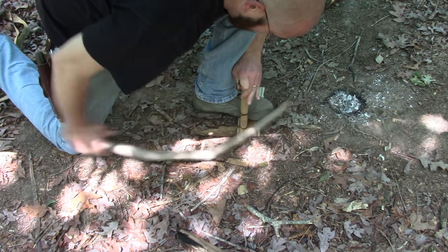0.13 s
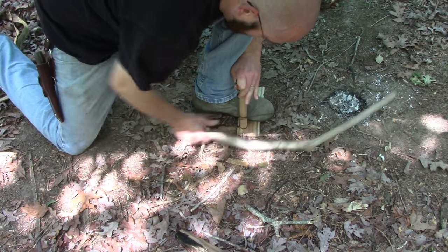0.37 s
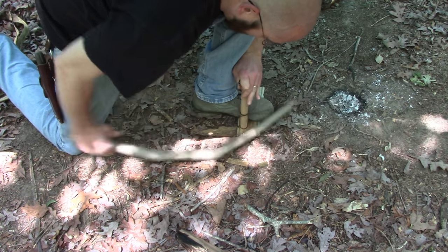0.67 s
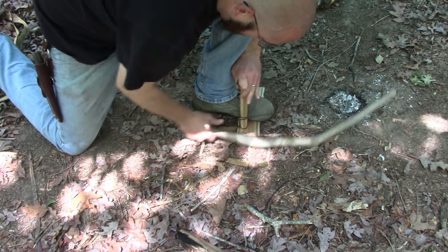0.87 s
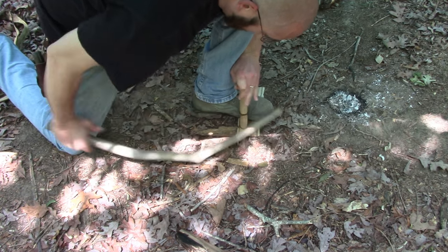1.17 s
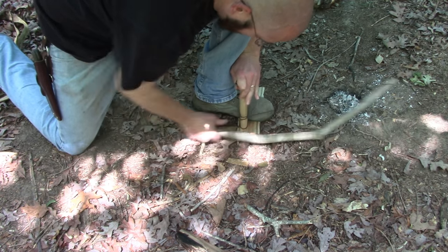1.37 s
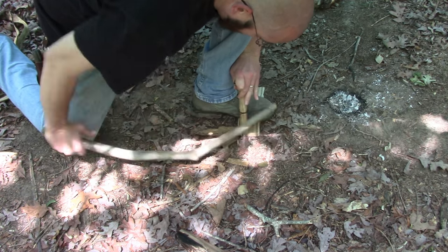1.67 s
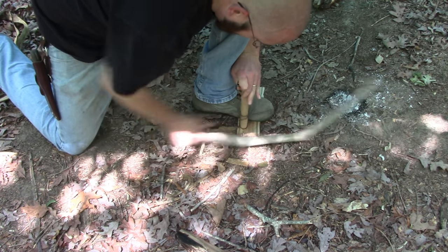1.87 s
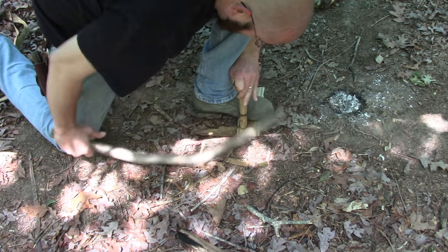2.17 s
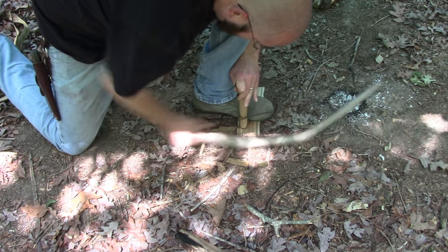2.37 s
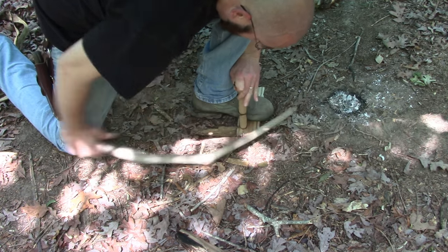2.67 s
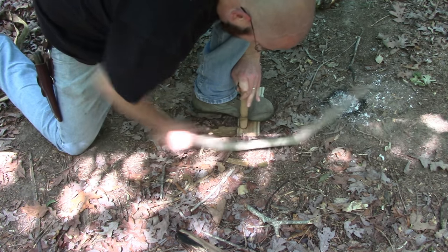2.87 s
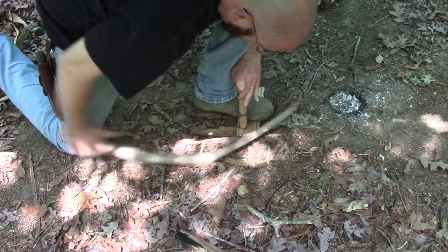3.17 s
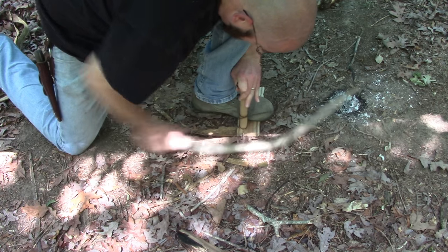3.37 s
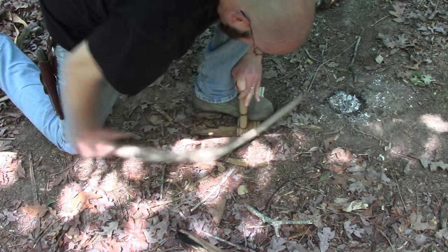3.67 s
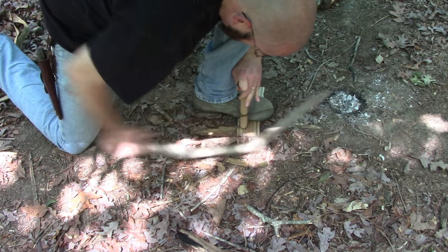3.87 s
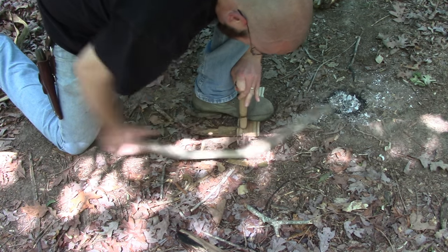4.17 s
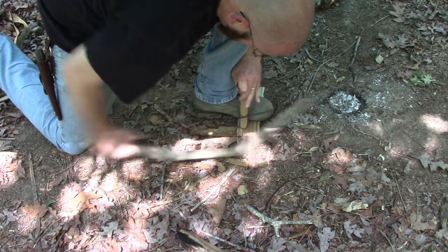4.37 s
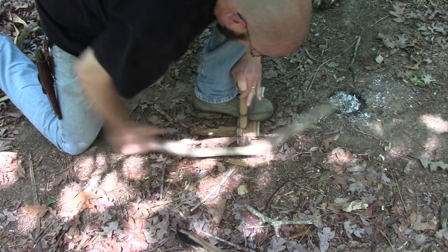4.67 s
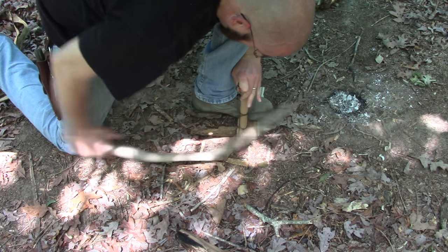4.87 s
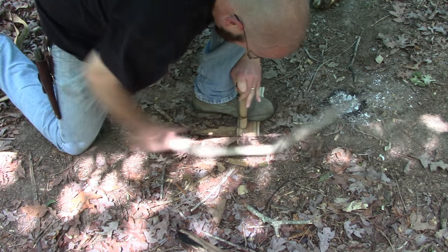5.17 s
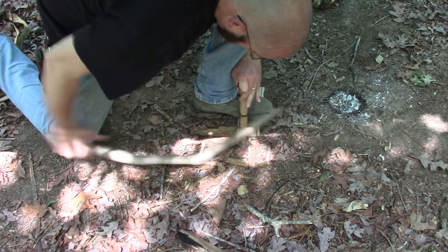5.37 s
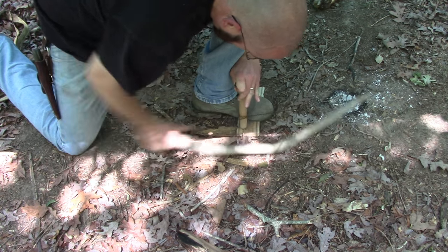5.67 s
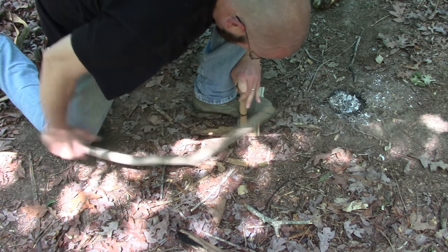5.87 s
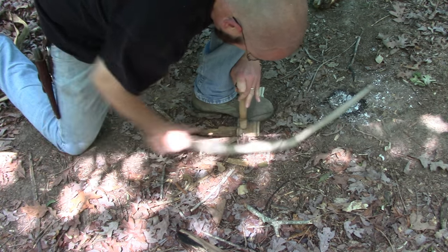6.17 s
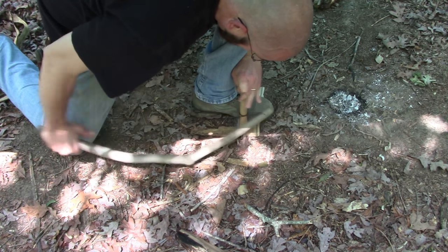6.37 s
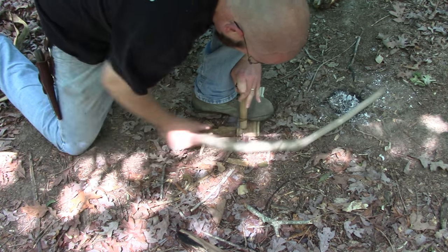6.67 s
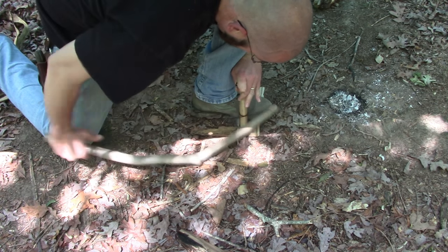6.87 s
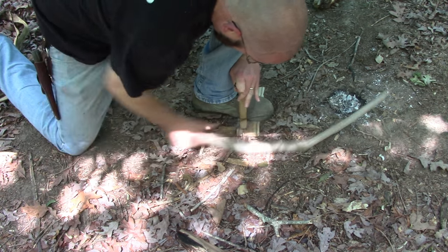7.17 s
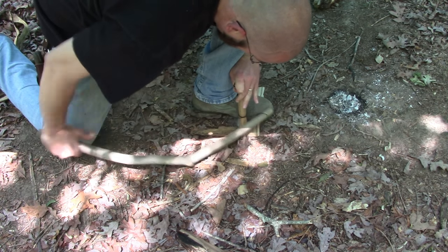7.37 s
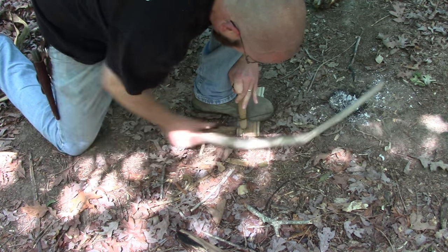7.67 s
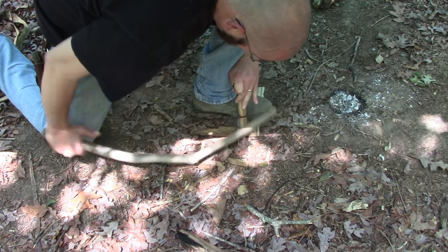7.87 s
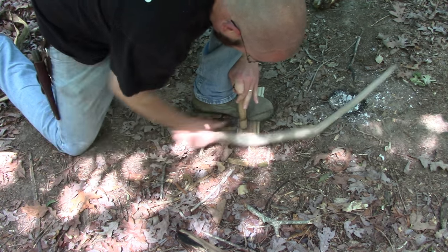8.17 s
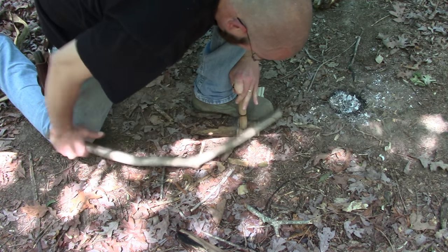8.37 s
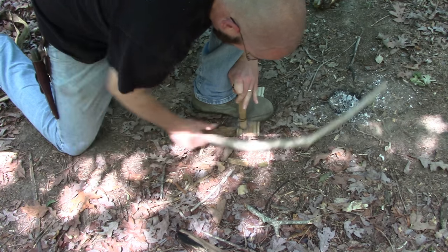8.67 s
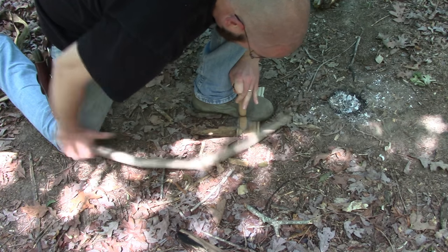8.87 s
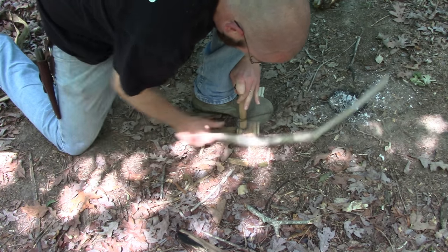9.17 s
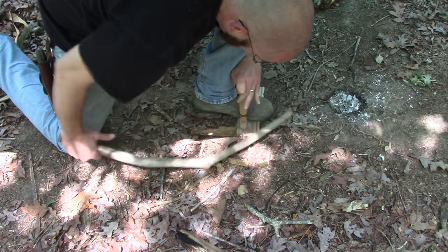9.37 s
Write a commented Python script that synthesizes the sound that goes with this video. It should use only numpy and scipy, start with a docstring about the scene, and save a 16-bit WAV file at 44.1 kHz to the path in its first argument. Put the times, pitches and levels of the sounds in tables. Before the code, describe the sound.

Close outdoors in the woods, a bow drill is sawed rapidly to and fro, about four strokes a second. Dry, fibrous rubbing swells and dips with each stroke, with a thin ringing near 3 kHz. A very loud squeal bursts out just after one second, then shorter squeaks recur. Soft knocks and, later, crackling dry litter join in. Faint rumble and distant traffic hum lie underneath, picked up by a small stereo camera microphone.

```python
"""Outdoors among trees, a small camera microphone pair hears far traffic hum under air and low rumble.
From the start a bow drill is sawed to and fro: the wooden spindle rubs in its board, reversing each stroke.
The rubbing is torn-fibre noise, which also rings the spindle near 3 kHz and, lower down, the board.
From the first second a tight spot grips about once a turn and squeals, a gliding near sine; the bow knocks.
From five seconds dry litter snaps in bursts of bright noise; loud squeals overload and turn the gain down."""
import sys
import numpy as np
from scipy import signal
from scipy.fft import rfft, irfft, next_fast_len
from scipy.io import wavfile

SR = 44100
rng = np.random.default_rng(int(sys.argv[2]) if len(sys.argv) > 2 else 0)


def undo_db(level):
    """Turn decibels back into plain size, where 20 dB means ten times bigger."""
    steps = np.asarray(level, float) / 20
    return 10 ** steps


def transcribe(signal):
    """Save signal, clipped to [-1, 1], as a 16-bit WAV file at the path in sys.argv[1]."""
    frames = np.atleast_2d(signal).T
    limited = np.clip(frames, -1, 1)
    pcm = np.round(limited * 32767).astype(np.int16)
    wavfile.write(sys.argv[1], SR, pcm)


N = 420273


def unit_power(x):
    """Scale to unit power."""
    return x / np.sqrt(np.mean(x ** 2) + 1e-20)


def at_hz(points, column, hz):
    """Read a column of a table along log frequency."""
    points = np.array(points)
    return np.interp(np.log(hz + 1), np.log(points[:, 0]), points[:, column])


def colour(x, spectrum, column=1):
    """Give noise a spectrum; unit power."""
    size = next_fast_len(N)
    gain = undo_db(at_hz(spectrum, column, np.fft.rfftfreq(size, 1 / SR)))
    return unit_power(irfft(rfft(x, size) * gain, size)[..., :N])


def resonate(x, modes):
    """Parallel resonators from (Hz, width in Hz, relative dB); unit power."""
    out = 0
    for hz, width_hz, db in modes:
        r = np.exp(-np.pi * width_hz / SR)
        gain = undo_db(db) * np.sqrt(1 - r * r)
        poles = [1, -2 * r * np.cos(2 * np.pi * hz / SR), r * r]
        out = out + gain * signal.lfilter([1, 0, -1], poles, x)
    return unit_power(out)


def drift(rate_hz):
    """Slow random wander with spread 1."""
    r = np.exp(-2 * np.pi * rate_hz / SR)
    return unit_power(signal.lfilter([1], [1, -2 * r, r * r], rng.standard_normal(N + SR))[SR:])


# Far woods and air. Each row: frequency in Hz, relative level in dB per Hz.
WOODS_SPECTRUM = [(20, -2), (64, -5.5), (200, -9.5), (600, -21), (1200, -23.5), (2500, -25.5), (5000, -30),
                  (9000, -36), (15600, -45.5)]


def woods():
    """Far rumble and air that swell slowly, with the wavering low hum of traffic as narrow-band noise."""
    swell_db = 0.8 * drift(1.5)
    air = colour(rng.standard_normal((2, N)), WOODS_SPECTRUM) * undo_db(-49.5 + swell_db)
    hum = resonate(rng.standard_normal(N), [(61, 13.7, 0)]) * undo_db(-53)
    return air + hum * [[1], [0]]   # the hum is in the draw that both microphones share


def trees(x):
    """Scattered echoes off trunks and ground: a decaying noise tail after a gap of 4 ms."""
    t60_s, echo_db = 0.32, -19
    t = np.arange(SR // 2) / SR
    tail = rng.standard_normal((2, len(t))) * undo_db(-60 * t / t60_s) * (t > 0.004)
    tail = tail / np.sqrt(np.sum(tail[0] ** 2))
    return signal.fftconvolve(x[None], tail, axes=1)[:, :N] * undo_db(echo_db)


# Dull knocks of the bow. Each row: start in seconds, nominal level in dB, pitch in Hz.
BOW_KNOCKS = [(0.108, -39, 775), (1.175, -33, 780), (1.707, -31, 760), (6.944, -34, 212), (7.322, -24, 339),
              (7.715, -34, 408), (7.844, -30, 403), (9.487, -31.5, 720)]


def knocks():
    """A soft blow: a few damped cycles at the pitch of the spot that is struck, with an overtone."""
    out, t = np.zeros(N + SR), np.arange(SR // 10) / SR
    envelope = np.exp(-t / 0.0035) * (1 - np.exp(-t / 0.00029))
    for start_s, db, hz in BOW_KNOCKS:
        i = round(start_s * SR)
        tone = np.sin(2 * np.pi * hz * t) + np.sin(2 * np.pi * 2 * hz * t) / 2
        out[i:i + len(t)] += undo_db(db) * envelope * tone
    return out[:N]


def bursts(events, lo_hz, hi_hz, decay_s):
    """Short puffs of band noise that die away, from (seconds, dB) pairs."""
    clicks = np.zeros(N)
    for start_s, db in events:
        clicks[round(start_s * SR)] = undo_db(db)
    envelope = signal.lfilter([1], [1, -np.exp(-1 / (decay_s * SR))], clicks + 1e-18)
    band = signal.butter(2, [lo_hz, hi_hz], "band", fs=SR, output="sos")
    puffs = signal.sosfilt(band, envelope * rng.standard_normal((2, N)))
    return puffs * np.sqrt(SR / 2 / (hi_hz - lo_hz))   # make up for the power outside the band


# Litter snapping. Each row: start in seconds, nominal upper-band level in dB, lower band against upper in dB.
LITTER_SNAPS = [(5.036, -35.5, -9), (5.0557, -37, -2), (6.1053, -38.5, -7), (7.267, -28.5, -2),
                (7.4257, -35, 7), (7.7594, -34, 3.5), (8.8085, -25, -10), (8.814, -26, -17),
                (8.8326, -28.5, -9), (9.3132, -27, -13)]


def snaps():
    """Dry leaves and twigs crack brightly: a brief high band over a slightly longer lower one."""
    high = bursts([(s, db) for s, db, low in LITTER_SNAPS], 7400, 10800, 0.0022)
    return high + bursts([(s, db + low) for s, db, low in LITTER_SNAPS], 3900, 5700, 0.0065)


# Grips of the tight spot, about one a turn, mostly late in a push.
# Each row: start in seconds, length in ms, nominal level in dB, middle pitch in Hz.
GRIPS = [(0.679, 11, -45, 3750), (0.708, 16, -32, 3730), (0.746, 20, -33, 3680), (0.783, 16, -31, 3690),
         (1.195, 17, -19.5, 3100), (1.211, 9.9, -19, 3200), (1.2269, 31, -4, 3210), (1.246, 13, 0.5, 3290),
         (1.254, 30, 10, 3130), (1.279, 31, 4, 3130), (2.216, 21, -22, 3020), (2.25, 20.3, -12.5, 3134),
         (2.289, 27.4, -3.5, 3150), (2.317, 30.4, -2.5, 3100), (3.3299, 22, -18.5, 2980),
         (3.359, 24.7, -7, 3135), (3.867, 23.3, -7, 3134), (3.901, 17.4, -6.5, 3157),
         (4.3569, 10.6, -13.5, 3010), (4.3892, 27, -19.5, 3200), (4.419, 17, -18.5, 3127),
         (4.888, 12, -15, 3030), (4.935, 10.5, -21, 3064), (4.9438, 15.7, -12.5, 2980),
         (5.1974, 15.5, -19, 3120), (5.41, 26, -11, 3130), (5.434, 28, -8.5, 3148), (5.464, 28, -16, 3130),
         (5.8978, 21, -14, 3110), (5.9303, 13, -10, 3165), (5.957, 16.7, -3, 3160),
         (5.9818, 27.2, -2, 3170), (6.471, 24.8, -19.5, 3180), (6.501, 9.1, -17.5, 3080),
         (6.9559, 15, -17, 3180), (6.9668, 11.7, -14, 2860), (6.987, 16, -19.5, 2970),
         (7.016, 9.4, -14.5, 2940), (7.463, 10, -10.5, 3086), (7.474, 17, -10.5, 3060),
         (7.4865, 31.2, -0.5, 3070), (7.514, 27, -12, 3060), (7.932, 11, -23.5, 2880),
         (7.976, 20, -14, 3080), (7.9931, 34, -6, 3014), (8.0166, 26.4, -3.5, 3032),
         (8.0408, 11.2, -6, 2995), (9.0542, 27.7, -17.5, 3125), (9.5069, 21, -17, 3070)]
# One squeal lingers over a reversal, rough. Each row: time in seconds, tone in dB, octave above in dB.
LINGERING = [(1.25, -50, -77), (1.28, -27, -21), (1.329, -15, -39.5), (1.379, -18.5, -30.5),
             (1.42, -31.5, -49), (1.5, -34, -57), (1.55, -56, -83)]


def squeals():
    """Stick-slip locks onto the spindle mode: a near sine that swells, glides, wavers and lets go."""
    glide_hz_per_ms = 7   # the pitch rises while a grip lasts
    out, waver, flutter = np.zeros(N + SR), drift(40), drift(68)
    for start_s, ms, db, middle_hz in GRIPS:
        i, done = round(start_s * SR), np.linspace(0, 1, round(ms * SR / 1000))
        hz = middle_hz + glide_hz_per_ms * ms * (done - 0.5)
        swell = np.sin(np.pi * done ** 1.12) ** 0.91     # builds more slowly than it lets go
        out[i:i + len(done)] += undo_db(db) * swell * np.sin(2 * np.pi * np.cumsum(hz) / SR)
    # timing wavers by samples, level flutters in dB
    out = np.interp(np.arange(N) + 2.0 * waver, np.arange(N), out[:N]) * undo_db(2.56 * flutter)
    s, *levels_db = np.transpose(LINGERING)
    for mode, db in zip([(3130, 143, 0), (6260, 350, 0)], levels_db):
        rough = resonate(resonate(rng.standard_normal(N), [mode]), [mode])
        out = out + rough * undo_db(np.interp(np.arange(N) / SR, s, db, -np.inf, -np.inf))
    return out


# Bow strokes, pull and push in turn, each lasting until the next.
# Each row: start in seconds, relative rubbing level in dB, nominal spindle ringing at mid-stroke in dB.
BOW_STROKES = [(-0.2, -44.5, -38), (0.045, -44.5, -30), (0.292, -44.5, -32), (0.574, -47, -34),
               (0.831, -44, -34), (1.119, -43.5, -32), (1.358, -44.5, -32), (1.642, -46, -30.5),
               (1.887, -44.5, -31.5), (2.147, -45, -28.5), (2.396, -45.5, -32.5), (2.671, -46, -31),
               (2.908, -44, -31), (3.189, -45.5, -29.5), (3.427, -44.5, -30), (3.724, -44, -27),
               (3.969, -43.5, -30), (4.242, -45.5, -31), (4.485, -44.5, -29), (4.775, -44, -27),
               (5.01, -41.5, -28.5), (5.29, -43.5, -28.5), (5.532, -43, -29), (5.806, -43, -28),
               (6.05, -42, -29), (6.325, -43, -29), (6.574, -44, -31), (6.84, -43, -26),
               (7.075, -42, -31.5), (7.348, -43, -24.5), (7.583, -43, -31.5), (7.846, -43, -28.5),
               (8.092, -45, -30.5), (8.356, -45, -29), (8.61, -44.5, -33.5), (8.881, -44, -29),
               (9.118, -43, -33), (9.369, -44, -27.5), (9.63, -44, -32)]
# The board rings more, on the whole, as the hole deepens.
# Each row: time in seconds, relative level on a pull in dB, on a push in dB.
BOARD_LEVELS = [(0.2, -43, -88), (3.0, -40, -79), (5.1, -38.5, -65), (6.4, -39, -53), (7.5, -38.5, -43.5),
                (8.201, -33.5, -52), (9.5, -40.5, -44.5)]


def bowing():
    """Direction, share of the stroke done, spindle speed 0-1 and the levels in dB that each stroke sets."""
    # pairs are (pull, push): share of the stroke at which the bow is fastest, dB change over a stroke
    fastest, ring_swell_db, rub_swell_db = np.array([(0.56, 0.59), (-4, -2.5), (3.5, -3.8)])
    t, rows = np.arange(N) / SR, np.array(BOW_STROKES)
    k = np.clip(np.searchsorted(rows[:, 0], t) - 1, 0, len(rows) - 2)
    pull, side = k % 2 == 0, k % 2
    start_s, rub_db, ring_db = rows[k].T
    done = np.clip((t - start_s) / (rows[k + 1, 0] - start_s), 0, 1)
    bent = done ** (np.log(0.5) / np.log(fastest[side]))    # the arm speeds up longer than it brakes
    speed = np.sin(np.pi * bent)
    ring_db = ring_db + ring_swell_db[side] * (done - 0.5)
    s, pull_db, push_db = np.transpose(BOARD_LEVELS)
    board_db = np.where(pull, np.interp(t, s, pull_db), np.interp(t, s, push_db))
    board_db = board_db + 1.36 * (rub_db + 44.5)   # follows rubbing above or below its usual -44.5 dB
    board_db = board_db + 1.5 * (k % 4 == 0)   # every second pull bears harder on the board
    rub_db = rub_db + rub_swell_db[side] * (done - 0.5)
    return pull, done, speed, rub_db, ring_db, board_db


def grit(per_s, spread_db, smooth):
    """Fibres tearing: dense clicks of uneven size on smooth noise, two unrelated draws."""
    sizes = undo_db(spread_db * np.minimum(rng.exponential(1, (2, N)), 4)) * rng.choice([-1, 1], (2, N))
    clicks = unit_power(sizes * (rng.random((2, N)) < per_s / SR))
    return clicks + smooth * rng.standard_normal((2, N))


# Colour of wood rubbing on wood. Each row: frequency in Hz, relative pull level, push level in dB per Hz.
RUB_SPECTRUM = [(120, -14, -10), (330, -9.5, -5.5), (700, -4.5, -4.5), (1270, -4, -8), (1865, -1.5, 3.5),
                (2230, 0, -1.5), (3670, 5.5, 2.5), (4140, -1.5, -3.5), (4870, -2, -2), (5160, 0.5, -3),
                (5580, -6, 2), (5790, -4, 1), (5880, -2.5, -8.5), (6800, -16.5, -16.5), (8210, -2.5, -2),
                (9000, -10.5, -11.5), (11630, -16.5, -18.5), (15800, -28.5, -27.5)]


def friction_hiss(pull, speed, rub_db, turn):
    """Friction noise heard directly, louder with speed; the two directions are coloured differently."""
    unsteady_db = 1.3 * drift(14)
    fibres = grit(4000, 4.3, 1.3)
    hiss = np.where(pull, colour(fibres, RUB_SPECTRUM, column=1), colour(fibres, RUB_SPECTRUM, column=2))
    dull = signal.sosfilt(signal.butter(2, 2800, fs=SR, output="sos"), hiss)
    # coarse and fine grain come and go
    hiss = dull * undo_db(1.83 * drift(50)) + (hiss - dull) * undo_db(1.1 * drift(26))
    return hiss * undo_db(rub_db + 6.5 + 0.57 * turn + unsteady_db) * speed ** 0.91


# Spindle modes on a pull. Each row: nominal frequency in Hz, width in Hz, relative level in dB.
PULL_MODES = [(3200, 410, 8), (3780, 1200, -18.5), (2930, 100, -16)]
# Spindle modes on a push. Each row: nominal frequency in Hz, width in Hz, relative level in dB.
PUSH_MODES = [(3100, 87, 2), (2863, 136, -1.5), (3785, 95, -16.5)]


def spindle_ringing(pull, done, speed, ring_db, turn):
    """Small slips ring the spindle's modes; a pull starts high and settles, a push rings patchily."""
    slips = resonate(grit(900, 2.0, 1.0), [(3200, 440, 0)])
    settling = resonate(slips, PULL_MODES)
    patchy = 0
    # the modes come and go separately, the top one most of all
    for mode, depth_db in zip(PUSH_MODES, (1.5, 1.5, 6)):
        patchy = patchy + resonate(slips, [mode]) * undo_db(mode[2] + depth_db * drift(32))
    # the pitch wanders and sinks as the tip wears into the board
    start_high = 0.12 * pull * np.exp(-done / 0.25)
    wear = (0.006 + 0.003 * pull) * np.arange(N) / SR
    pitch = 1.03 + start_high - wear + 0.015 * drift(9)
    read = np.cumsum(pitch) % (N - 1)
    settling, patchy = (np.array([np.interp(read, np.arange(N), v) for v in unit_power(x)])
                        for x in (settling, patchy))
    uneven_db = 1.6 * drift(13)
    return np.where(pull, settling, patchy) * undo_db(ring_db + 0.81 * turn + uneven_db) * speed ** 1.31


# Board resonances. Each row: frequency in Hz, width in Hz, relative level in dB.
BOARD_MODES = [(1290, 124, 5.5), (370, 150, -0.5)]


def board_ringing(done, speed, board_db):
    """Coarse grit excites the board's modes, more strongly towards the end of each stroke."""
    level_db = board_db + 0.5 + 0.69 * drift(11) + 23.3 * (done - 0.9)
    return resonate(grit(700, 5.0, 0.47), BOARD_MODES) * undo_db(level_db) * speed ** 2


def rubbing():
    """Friction heard directly and through spindle and board, as the bow drives it."""
    pull, done, speed, rub_db, ring_db, board_db = bowing()
    turns_per_s = 28 * (1 + 0.14 * drift(3.87))
    turn = np.sin(2 * np.pi * np.cumsum(turns_per_s) / SR)   # pressure swings once a turn
    hiss = friction_hiss(pull, speed, rub_db, turn)
    ring = spindle_ringing(pull, done, speed, ring_db, turn)
    return hiss + ring + board_ringing(done, speed, board_db)


# The microphone pair. Each row: frequency in Hz, left minus right in dB, right's phase lead in radians,
# likeness from 0 to 1.
MICROPHONE_PAIR = [(340.0, -0.1, 0.048, 0.99), (1000.0, 0, 0.03, 0.995), (2410.0, -1, 0.01, 1.0),
                   (2930.0, 0.1, 0.16, 1.0), (4480.0, 3, 0.3, 0.98), (5510.0, 3.8, 0.77, 0.97),
                   (6030.0, 5.5, 0.68, 0.4), (6550.0, 0.4, 1.07, 0.45), (7060.0, -4, 0.73, 0.6),
                   (7580.0, -4.5, 0.41, 0.82), (9130.0, 1.5, 0.55, 1), (10680.0, 2.5, -0.13, 0.8),
                   (11710.0, 3, -1.1, 0.74), (13260.0, -1.5, -0.69, 0.66), (15330.0, 7, 0.2, 0.89)]


def microphones(main, other):
    """The pair differs in level and phase; the unlike part is the second draw, in opposite sign."""
    size = next_fast_len(N)
    hz = np.fft.rfftfreq(size, 1 / SR)
    ratio = undo_db(-at_hz(MICROPHONE_PAIR, 1, hz)) * np.exp(1j * at_hz(MICROPHONE_PAIR, 2, hz))   # right / left
    alike = np.clip(at_hz(MICROPHONE_PAIR, 3, hz), 0, 1)
    unlike = np.sqrt((1 - alike) / (1 + alike)) * rfft(other, size)
    shared = 2 * rfft(main, size) / (1 + ratio)
    return irfft(np.array([shared + unlike, shared * ratio - unlike]), size)[:, :N]


def scene():
    """Drill, litter and woods at the two microphones."""
    tones, noises = squeals() + knocks(), rubbing() + snaps()
    heard = noises + trees(noises[0] / 2 + tones) + woods()
    return microphones(heard[0] + tones, heard[1])


def low_pass(x):
    """Removes everything above the highest recorded frequency."""
    return signal.sosfilt(signal.butter(12, 15760, fs=SR, output="sos"), x)


def record(dry):
    """Gain control holds a loud squeal down and recovers; what slips past it overloads."""
    attack_s, release_db_per_s = 0.002, 140
    knee_db, slope = -13.5, 0.89   # dB of cut per dB above the knee
    overload, sharpness = 0.55, 1.97   # limiting amplitude and abruptness of the bend
    fast = np.exp(-1 / (attack_s * SR))
    power = signal.lfilter([(1 - fast) ** 2], [1, -2 * fast, fast ** 2], np.mean(dry ** 2, axis=0))
    over_db = np.maximum(10 * np.log10(power + 1e-12) - knee_db, 0) * slope
    ramp_db = np.arange(N) / SR * release_db_per_s
    cut_db = np.maximum.accumulate(over_db + ramp_db) - ramp_db   # a held peak, let go steadily
    held = dry * undo_db(-cut_db)
    mix = held / (1 + np.abs(held / overload) ** sharpness) ** (1 / sharpness)
    return low_pass(mix)


dry = scene()
out = record(dry)
transcribe(out)
```